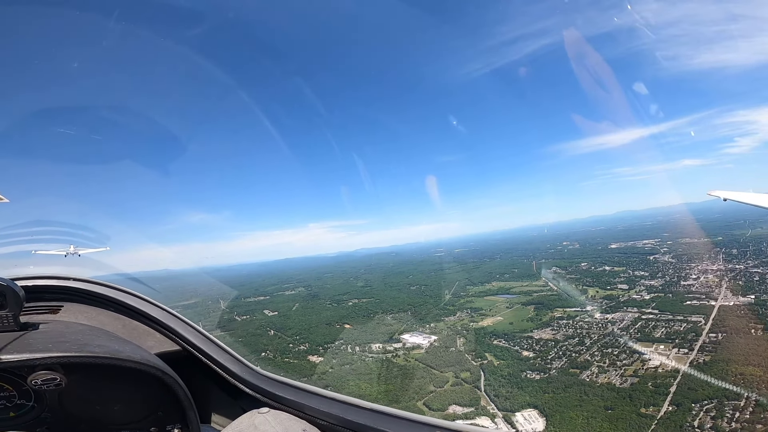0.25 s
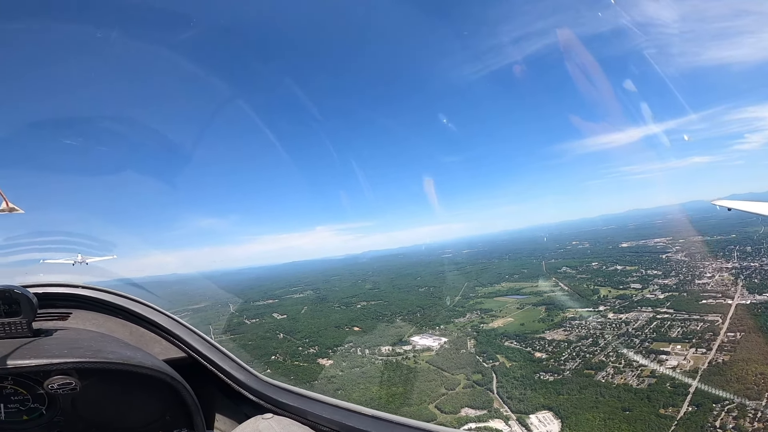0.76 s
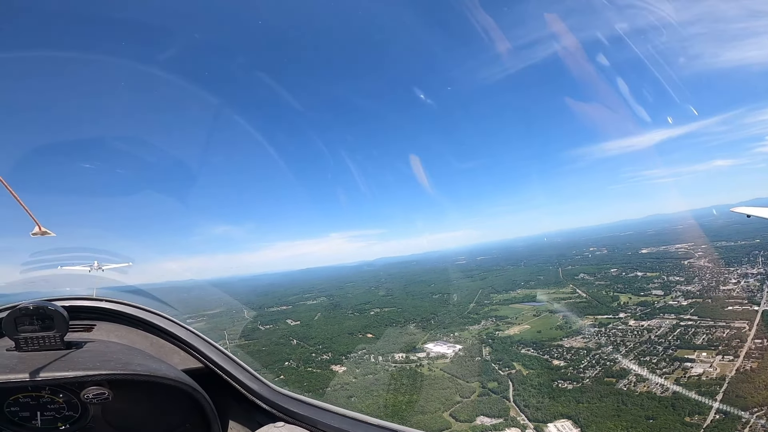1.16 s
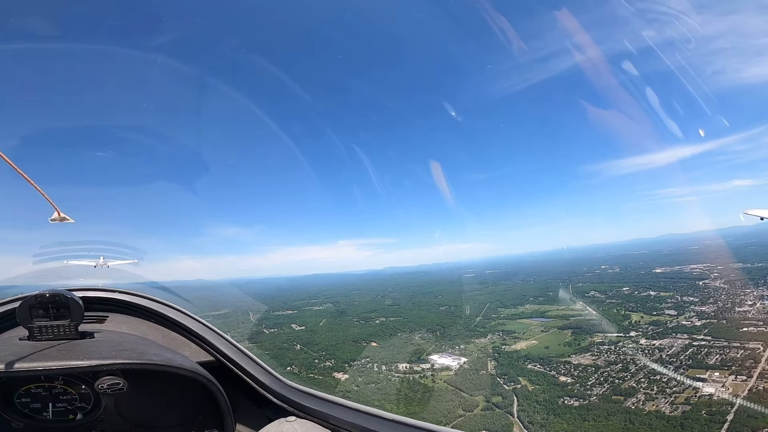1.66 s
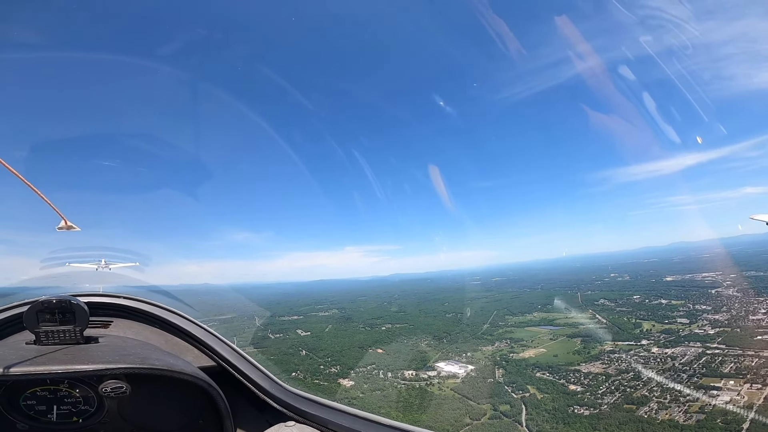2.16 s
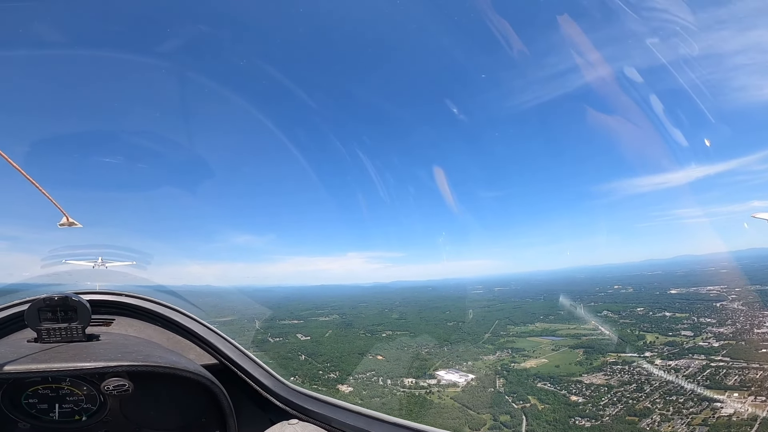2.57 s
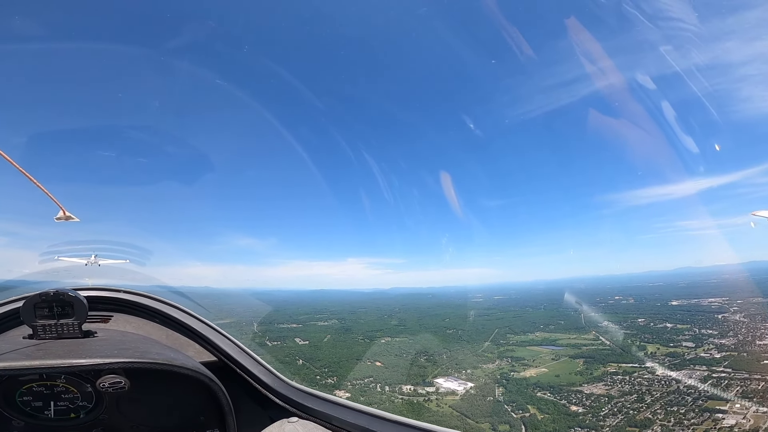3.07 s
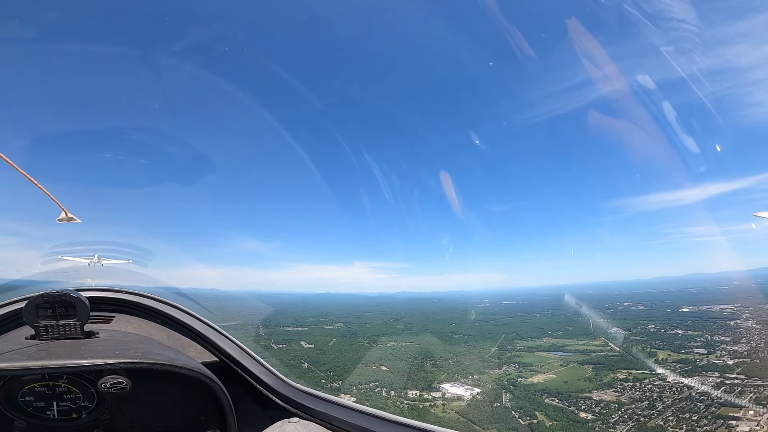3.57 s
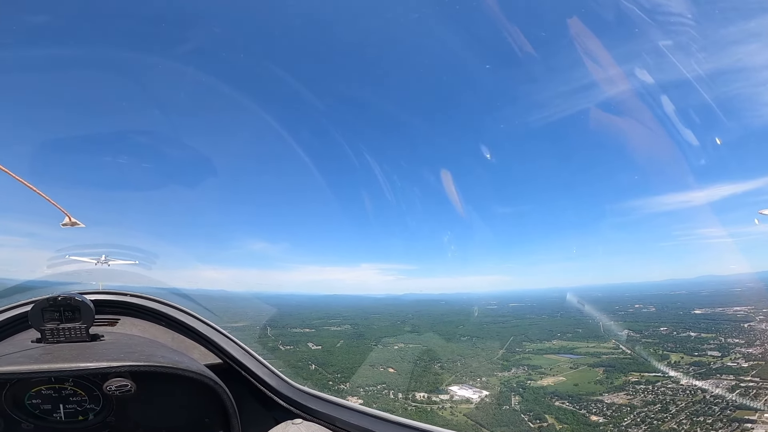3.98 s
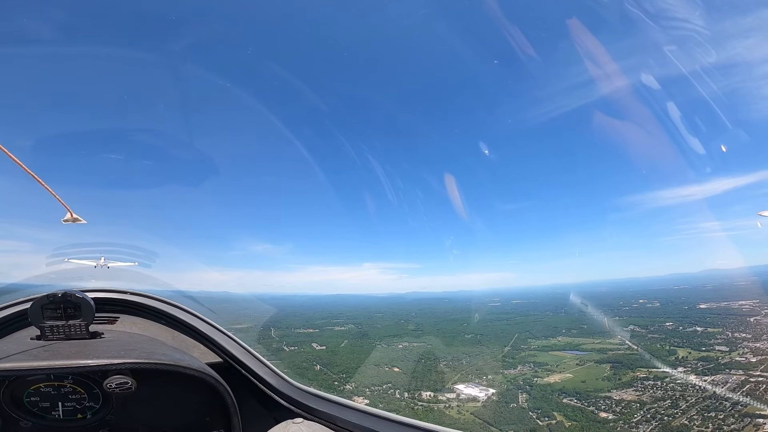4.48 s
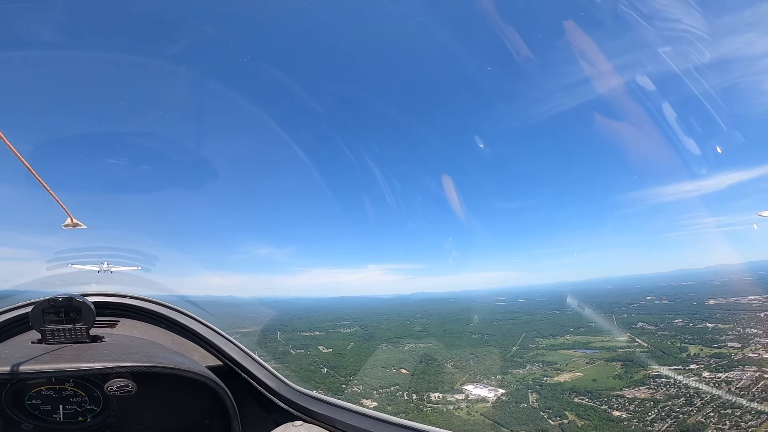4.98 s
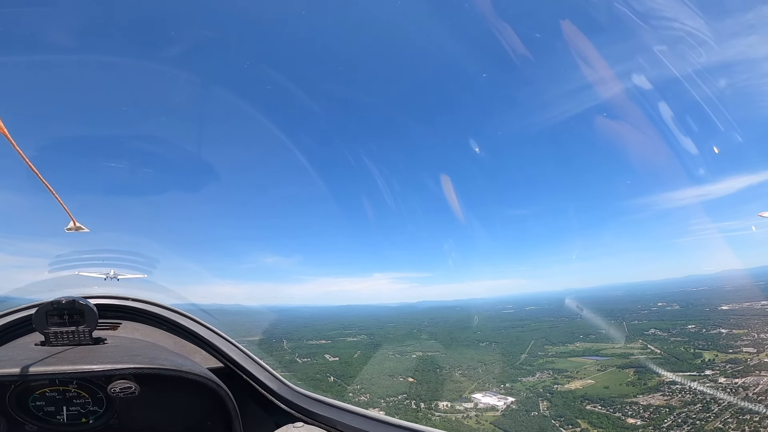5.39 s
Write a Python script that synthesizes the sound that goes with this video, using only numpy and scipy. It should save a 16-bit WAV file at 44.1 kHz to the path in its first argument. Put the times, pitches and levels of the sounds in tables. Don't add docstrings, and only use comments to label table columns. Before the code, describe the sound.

Heard from the seat of a glider under tow: turbulent air drums on canopy and hull as a continuous low boom. Thin hiss and blurred whistling leak at the canopy seals, and the tow plane's engine drones faintly below. An opening gust eases within a second, a tiny frame tick passes, then the roar stays nearly even. A small stereo camera microphone flattens the swells.

```python
import sys
import numpy as np
from scipy import signal
from scipy.io import wavfile
from scipy.ndimage import uniform_filter1d

SR = 44100
rng = np.random.default_rng(int(sys.argv[2]) if len(sys.argv) > 2 else 0)


def transcribe(signal):
    frames = np.atleast_2d(signal).T
    limited = np.clip(frames, -1, 1)
    pcm = np.round(limited * 32767).astype(np.int16)
    wavfile.write(sys.argv[1], SR, pcm)


def gain_from_db(level_db):
    decades = np.asarray(level_db, float) / 20
    return 10 ** decades


N = 248724

# multiple of the base pitch, level/dB rms
ENGINE_ORDERS = [(1, -42.5), (2, -26.5), (3, -31)]
# f/Hz, width/Hz, level/dB, left-right/dB
SEAL_CAVITIES = [(886, 20, -5.5, 0), (920.3, 51, -2, 3), (1018.7, 42, -5.5, 0), (1186.6, 29.5, -5.5, 1),
                 (709, 11, -12, 4.5), (1403, 63, -17, -1), (1847, 54, -23.5, -3), (2392, 180, -25, -1.5)]
# f/Hz, level/dB per Hz
RUSH_COLOUR = [(20, -4.5), (90, -6), (220, -2), (450, -9), (760, -8.5), (850, -16.5), (1100, -14.5),
               (1400, -17), (1520, -17), (2000, -22.5), (2400, -23.5), (3300, -28.5), (3900, -31),
               (4400, -31), (5000, -35.5), (5900, -39), (7000, -43), (8200, -46.5), (9000, -47),
             (10200, -52.5), (10900, -59.5), (11600, -58.5), (13000, -65.5), (14900, -71.5)]
# f/Hz, likeness (1 = identical)
LIKENESS = [(20, 1), (400, 0.92), (480, .65), (700, 1), (1100, 0.63), (1350, .8), (1900, 0.27), (2400, .8),
            (3400, 0.5), (5000, 0.13), (15000, .15)]
# f/Hz, left-right/dB
LEAN = [(20, 5), (260, 1.5), (420, -1), (690, 3), (1130, 5.5), (1640, 1), (2300, 7), (3300, 2.5),
        (4500, 0.5), (8000, 0), (14000, -0.5)]
# f/Hz, lead/rad
LEFT_LEAD = [(20, -.2), (60, -.08), (95, 0.046), (130, -0.086), (170, 0.19), (300, 0.53), (570, -0.1),
             (670, 0.89), (860, -0.46), (1300, -0.28), (2000, -.8), (2400, -0.4), (3500, -0.1),
             (4500, 0.23), (15000, -0.087)]
# f/Hz, width/Hz, level/dB
NULLS = [(91.2, 12, -11), (216.7, 23.7, -8.5), (353, 13, 1), (633, 40, -3), (892, 22, -2.5),
         (1467, 67, -4.5), (2150, 80, 0), (2850, 59, -2)]
# f/Hz, width/Hz, level/dB, left-right/dB
TAIL_BOOM = [(42, 17, -10, -.4), (57, 25, -0.5, -.5), (70.6, 8, 6, -.5)]
# f/Hz, width/Hz, level/dB, left-right/dB
HULL_MODES = [(116.9, 13.9, 1, -0.5), (163.7, 37.5, -3.5, -1.5), (186, 9.4, -22, 0.5),
              (241.3, 13.5, -11, -0.5), (277, 30, -20, 1), (307, 16, -17.5, 2.5), (330.4, 15, -28.5, -1.5),
              (358.8, 11, -22, 2.5), (422, 18, -24.5, 1)]
# t/s, level/dB
SIDESLIP = [(0, 3.5), (.26, 2), (.34, .5), (.56, 1.5), (.7, 0), (1.3, -0.1), (2.6, 0.25), (3.5, 0),
            (3.9, 1), (4.2, 0.34), (5.64, 0.5)]

ENGINE_HZ = 55.97
SPEEDUP_DB_PER_S = 0.23
# steady level in dB, share of the sideslip, share of the speed-up
BOOM, BUFFET = (-15.5, 0.55, -0.5), (-30, 0.1, 3.1)
WHISTLE, HISS = (-33.5, 0.09, 1.1), (-43, 1.57, 0.11)
RUSH_OVER_HISS_DB = 13

SIZE, HOP = 4096, 1024
FRAMES = N // HOP + 6
HZ = np.fft.rfftfreq(SIZE, 1 / SR)


def evened(x):
    return x / np.sqrt(np.mean(x ** 2) + 1e-20)


def read(points, hz):
    f, value = np.transpose(points)
    return np.interp(np.log(hz + 1), np.log(f + 1), value)


def slow(top_hz):
    t = np.arange(N) / SR
    drift = 0
    for f in np.geomspace(top_hz / 20, top_hz, num=16):
        drift = drift + np.sin(2 * np.pi * (f * t + rng.random())) / np.sqrt(f)
    return evened(drift)


def smooth(x, size):
    window = np.hanning(size)
    padded = np.pad(x, size, "edge")
    return signal.oaconvolve(padded, window / window.sum(), "same")[size:-size]


def level(steady_db, slip_share, speed_share):
    t = np.arange(N) / SR
    slip_db = np.interp(t, *np.transpose(SIDESLIP))
    return steady_db + slip_share * slip_db + speed_share * SPEEDUP_DB_PER_S * t


def turbulence(colour, likeness, patchy_db):
    a, b, c, d, patches = rng.standard_normal((FRAMES, len(HZ), 5)).T
    patches = uniform_filter1d(patches, size=40, axis=0)
    patches = evened(uniform_filter1d(patches, size=3, axis=1))
    likeness = np.clip(likeness, -1, 1)[:, None]
    left = a + 1j * b
    right = likeness * left + np.sqrt(1 - likeness ** 2) * (c + 1j * d)
    right = right * np.exp(-1j * read(LEFT_LEAD, HZ))[:, None]
    nulls_db = sum(db / (1 + (2 * (HZ - hz) / width) ** 2) for hz, width, db in NULLS)
    spectra = np.array([left, right]) * (colour * gain_from_db(nulls_db))[:, :, None]
    spectra = spectra * gain_from_db(patchy_db * patches)
    noise = signal.istft(spectra, nperseg=SIZE, noverlap=SIZE - HOP)[1]
    return evened(noise[:, SIZE:SIZE + N])


def ringing(modes, skirt):
    power = 0
    for hz, width, db, pan_db in modes:
        shape = (1 + (2 * (HZ - hz) / width) ** 2) ** -skirt
        shape = shape / (1 + (HZ / (3 * hz)) ** 6)
        power = power + shape * gain_from_db(2 * db + np.array([[pan_db], [-pan_db]]))
    return np.sqrt(power)


def tick():
    t = np.arange(N) / SR - 0.692
    burst = rng.standard_normal(N) * (t > 0) * np.exp(-np.maximum(t, 0) / 0.01)
    bright = signal.butter(2, 12500, "high", fs=SR, output="sos")
    return gain_from_db(-63) * signal.sosfilt(bright, burst)


def tug():
    turns = np.cumsum(ENGINE_HZ * (1 + 0.0254 * slow(5))) / SR
    drone = 0
    for k, db in ENGINE_ORDERS:
        loudness = gain_from_db(db + 2.0 + 2.4 * slow(7.5))
        drone = drone + loudness * np.cos(2 * np.pi * (k * turns + rng.random()))
    return drone * gain_from_db([[-0.22], [0.22]])


def seal():
    whistles = turbulence(ringing(SEAL_CAVITIES, skirt=1.45), np.ones(len(HZ)), patchy_db=-1.06)
    return whistles * gain_from_db(level(*WHISTLE))


def rush():
    colour_db = read(RUSH_COLOUR, HZ)
    colour = gain_from_db(colour_db + np.outer([0.5, -0.5], read(LEAN, HZ)))
    air = turbulence(colour, read(LIKENESS, HZ), patchy_db=0.3)
    return air * gain_from_db(level(*HISS) + RUSH_OVER_HISS_DB + 0.14 * slow(16))


def buffet():
    rumble = turbulence(ringing(TAIL_BOOM, skirt=1.9), np.ones(len(HZ)), patchy_db=-2.0)
    return rumble * gain_from_db(level(*BUFFET))


def upper_modes(boom):
    above = signal.butter(4, 210, "high", fs=SR, output="sos")
    upper = signal.sosfiltfilt(above, boom)
    return boom + upper * (gain_from_db(level(0, 1.3, 0)) - 1)


def hull():
    boom = turbulence(ringing(HULL_MODES, skirt=1.41), np.full(len(HZ), 0.9996), patchy_db=0.14)
    return upper_modes(boom * gain_from_db(level(*BOOM)))


def scene():
    return tick() + tug() + seal() + rush() + buffet() + hull()


def roll_off(x):
    return signal.sosfilt(signal.butter(12, 15100, fs=SR, output="sos"), x)


def record(dry):
    power_db = 10 * np.log10(abs(smooth((dry ** 2).mean(0), size=901)) + 1e-9)
    cut_db = 0.55 * smooth(np.maximum(power_db + 15, 0), size=401)
    bass = signal.sosfiltfilt(signal.butter(2, 330, fs=SR, output="sos"), dry)
    held = bass * gain_from_db(1.0 - cut_db) + (dry - bass) * gain_from_db(0.9 - 0.49 * cut_db)
    opening = np.minimum(np.arange(N) / SR / 0.002, 1)
    return roll_off(held * opening)


dry = scene()
out = record(dry)
transcribe(out)
```